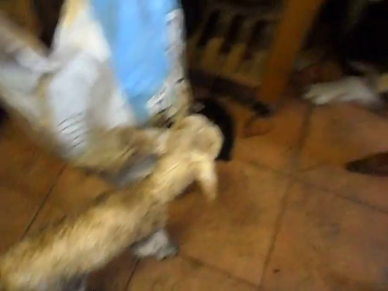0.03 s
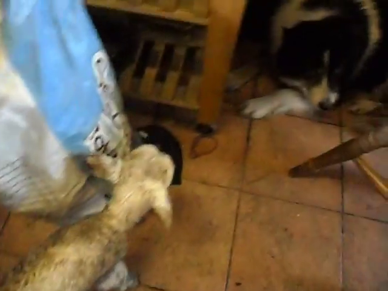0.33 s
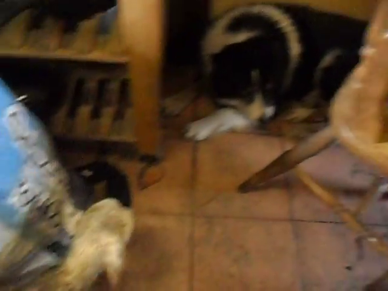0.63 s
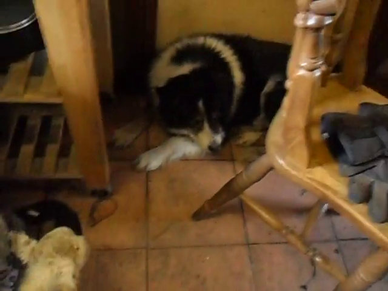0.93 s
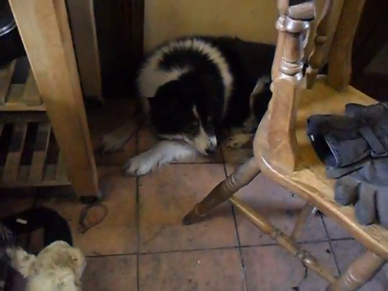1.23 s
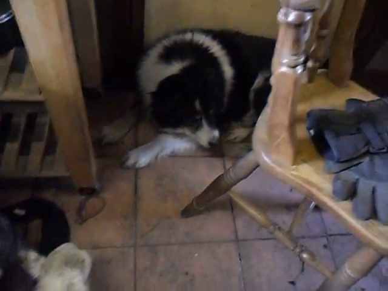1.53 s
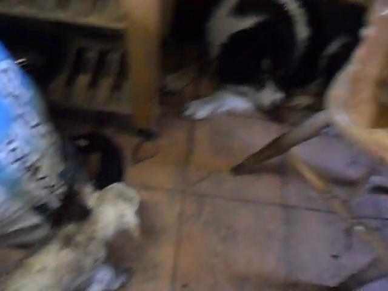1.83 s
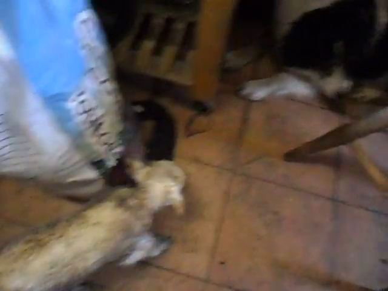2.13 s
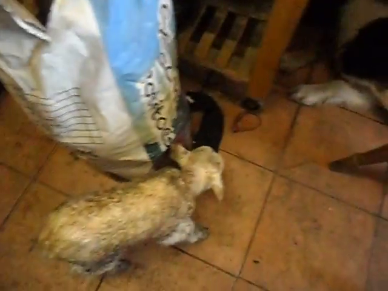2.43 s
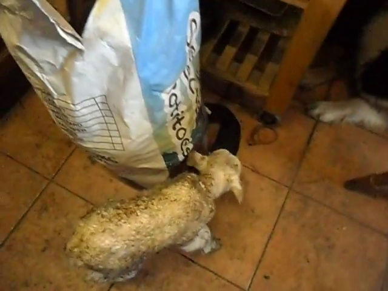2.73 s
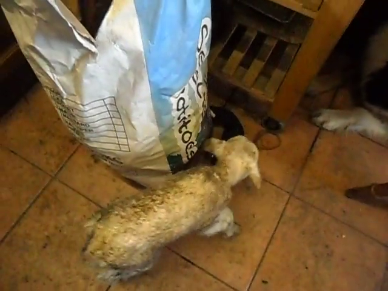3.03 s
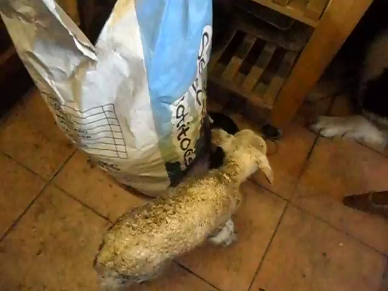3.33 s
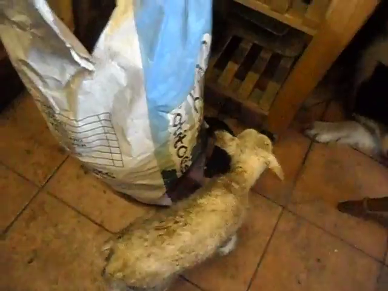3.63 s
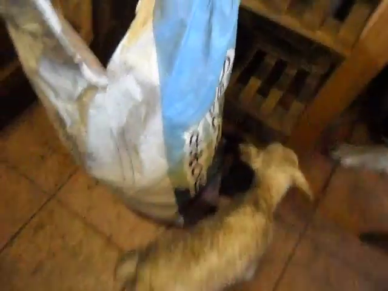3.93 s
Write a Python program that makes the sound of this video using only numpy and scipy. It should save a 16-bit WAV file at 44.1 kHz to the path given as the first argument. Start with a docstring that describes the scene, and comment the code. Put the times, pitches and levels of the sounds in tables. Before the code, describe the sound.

A young lamb bleats once, harsh and quavering, in a quiet kitchen.

```python
"""A young lamb bleats once in a quiet, tiled kitchen.
Its vocal folds buzz and rasp, and its moving mouth shapes the buzz: a soft grunt and a half-closed
start open into a harsh, quavering cry that clears, holds and sags away.
A few light ticks, likely its hooves, are tiny bursts of noise.
The walls answer with a short echo, and a steady hiss lies under it all."""
import sys
import numpy as np
from scipy import signal
from scipy.fft import rfft, irfft, next_fast_len
from scipy.io import wavfile
from scipy.ndimage import uniform_filter1d, map_coordinates

SR = 44100
rng = np.random.default_rng(int(sys.argv[2]) if len(sys.argv) > 2 else 0)


def dump(signal):
    """Clip the signal to [-1, 1] and save it as 16-bit WAV at the path in sys.argv[1]."""
    limited = np.clip(np.atleast_2d(signal).T, -1, 1)
    pcm = np.round(limited * 32767).astype(np.int16)
    wavfile.write(sys.argv[1], SR, pcm)


N = 176400  # 4 seconds

# The voice quavers as it climbs, holds, then sags. Each row: time in seconds, pitch in Hz.
VOICE_PITCH = [(3.22, 270), (3.255, 349.6), (3.33, 352.5), (3.38, 328.6), (3.4, 366.8), (3.43, 336.8),
               (3.452, 364), (3.478, 362), (3.505, 345.3), (3.548, 373.1), (3.57, 357), (3.59, 373.3),
               (3.645, 378.2), (3.68, 370.1), (3.73, 382.1), (3.765, 361), (3.79, 377.3), (3.815, 362.3),
               (3.835, 348), (3.88, 305.8)]
# The voice swells about 13 times a second. Each row: time in seconds, level in dB.
VOICE_LEVEL = [(3.21, -68.5), (3.258, -43.5), (3.283, -69), (3.305, -58), (3.343, -27.5), (3.382, -39.5),
               (3.422, -21), (3.448, -24), (3.478, -25), (3.502, -19), (3.525, -28), (3.562, -23.5),
               (3.615, -26), (3.657, -21.5), (3.684, -29), (3.71, -22), (3.735, -26.5), (3.752, -25.5),
               (3.766, -34.5), (3.802, -23), (3.82, -36), (3.866, -40.5), (3.897, -54)]
# How hoarse the voice is. Each row: time in seconds, roughness from 0 to 1.
VOICE_ROUGHNESS = [(3.23, .5), (3.26, .3), (3.34, .06), (3.385, .24), (3.42, .22), (3.45, .38), (3.49, .24),
                   (3.525, .38), (3.57, .22), (3.72, .1), (3.76, .3), (3.8, .12), (3.84, .45)]
# How the mouth moves. Each row: time in seconds, shape number
# (0 closed, 1 half closed, 2 wide open, 3 held, 4 half closed again).
MOUTH_MOVES = [(3.28, 0), (3.325, .5), (3.345, 1), (3.37, 1.05), (3.415, 2), (3.51, 2), (3.65, 3),
               (3.81, 3), (3.85, 3.25)]
# How the throat and mouth ring in each shape. Each row: frequency in Hz, boost or cut in dB.
MOUTH_CLOSED = [(200, -14), (350, 1), (700, -4), (1040, 3.5), (1400, -5), (2100, -14.5), (2750, -10),
                (3600, -17), (4800, -15), (7000, -27), (11000, -51)]
MOUTH_HALF_CLOSED = [(200, -63), (340, -9.5), (700, -12.5), (1040, 0.5), (1380, -5), (1750, -13),
                     (2150, -25), (2450, -12.5), (2750, -3), (3100, -5), (3350, -12), (3600, -24),
                     (4200, -16.5), (4800, -14.5), (5400, -28), (5900, -18.5), (6400, -31), (7000, -28),
                     (7800, -28), (9000, -36), (11000, -48.5)]
MOUTH_WIDE_OPEN = [(200, -43), (350, -19.5), (700, -22.5), (1060, -8), (1430, 1), (1780, -14.5),
                   (2100, -17.5), (2800, -12.5), (3050, -21), (3500, -2), (4100, -21), (4550, -7),
                   (5000, -5.5), (5600, -14.5), (6300, -21.5), (7200, -28.5), (8000, -34.5), (9600, -30),
                   (11000, -43.5)]
MOUTH_HELD = [(200, -59), (370, -26), (750, -20.5), (1130, -12.5), (1500, 5), (1880, -12.5), (2270, -11.5),
              (2650, -15), (3000, -22), (3400, -12), (3770, -5), (4200, -19.5), (4950, -12), (5600, -22.5),
              (6100, -19.5), (7000, -30.5), (8200, -33), (9500, -39.5), (11000, -49)]
# The throat catches between swells and chokes the bass. Each row: time in seconds, bass cut in dB.
THROAT_CATCHES = [(3.372, 12), (3.448, 11), (3.526, 12), (3.672, 0), (3.763, -1), (3.836, 10)]
# How bright the voice is. Each row: time in seconds, treble boost or cut in dB.
VOICE_TREBLE = [(3.44, 1), (3.465, -1), (3.505, 2), (3.6, -0.5), (3.66, 2.5), (3.685, 1), (3.71, 1),
                (3.75, 2), (3.77, 4), (3.8, -3.5), (3.825, 2), (3.87, -1.5)]
# Light ticks. Each row: start in seconds, peak level in dB, centre frequency in Hz, width in octaves.
HOOF_TICKS = [(3.392, -30, 900, 0.79), (3.634, -25.5, 8200, .35), (3.938, -32, 1200, 1.16),
              (3.958, -32, 2385, 1.8), (3.9915, -55, 4530, 1.3)]
# How long the kitchen echoes. Each row: frequency in Hz, seconds to fade by 60 dB.
ECHO_FADE = [(200, 0.3), (1200, 0.21), (3000, 0.33), (11000, 0.067)]
# The tone of the hiss. Each row: frequency in Hz, relative level in dB.
HISS_TONE = [(12, -41.5), (20, -2), (91, -1), (171, -3), (240, -2), (267, -3.5), (405, -4), (439, -5.5),
             (616, -6.5), (866, -7), (1460, -10), (2000, -10.5), (2340, -11.5), (7800, -16), (10400, -17.5),
             (13500, -37.5), (22000, -120)]
# The whole sound is duller at the very top. Each row: frequency in Hz, level change in dB.
TREBLE_ROLL_OFF = [(10200, 0), (10700, -8), (11200, -8), (12000, -14)]


def lamb(bass_hz=1200, treble_hz=2050, bass_boost_db=0.5, catch_half_width_s=0.014):
    """The mouth glides between four shapes that colour the buzz, while throat catches thin the bass."""
    shapes = [MOUTH_CLOSED, MOUTH_HALF_CLOSED, MOUTH_WIDE_OPEN, MOUTH_HELD, MOUTH_HALF_CLOSED]
    buzz, mouth, t = vocal_folds(), over_time(MOUTH_MOVES), np.arange(N) / SR
    voice = np.zeros(N)
    for number, shape in enumerate(shapes):
        share = np.maximum(1 - abs(mouth - number), 0)
        voice += share * filtered(buzz, lambda hz: at_frequency(shape, hz))
    bass = below(voice, bass_hz)
    treble = voice - below(voice, treble_hz)
    middle = voice - bass - treble
    choke_db = sum(db * np.exp(-((t - when) / catch_half_width_s) ** 2) for when, db in THROAT_CATCHES)
    voice = bass * gain(bass_boost_db - choke_db) + middle + treble * gain(over_time(VOICE_TREBLE))
    # Even out the loudness first, so that VOICE_LEVEL sets the swells.
    voice /= np.sqrt(abs(uniform_filter1d(voice ** 2, size=600)) + 1e-9)
    bleating = (t > VOICE_LEVEL[0][0]) & (t < VOICE_LEVEL[-1][0])
    return voice * gain(over_time(VOICE_LEVEL)) * bleating


def vocal_folds(jitter_cycles=0.035, shimmer_db=1.5, unsteady_hz=130, flutter_db=3.5, flutter_hz=27.99):
    """The folds pulse unevenly in timing (jitter) and strength (shimmer), with a rasp of air."""
    roughness = over_time(VOICE_ROUGHNESS)
    cycles = np.cumsum(over_time(VOICE_PITCH)) / SR
    phase = 2 * np.pi * (cycles + jitter_cycles * roughness * wobble(unsteady_hz))
    pulses = np.zeros(N)
    for harmonic in range(1, 35):
        # Each harmonic (a multiple of the pitch) swells and drops on its own, fully from the ninth up.
        depth_db = flutter_db * min(harmonic / 8.7, 1) ** 2
        lag = 0.0586 * harmonic ** 2  # in radians: higher harmonics arrive slightly later, softening each pulse
        pulses += gain(depth_db * wobble(flutter_hz)) * np.cos(harmonic * phase - lag)
    air = rasp(phase)
    shimmer = gain(shimmer_db * roughness * wobble(unsteady_hz))
    return normalised(pulses) * shimmer + roughness * air


def rasp(phase, boost_db=6.5, edge_hz=5200):
    """The folds tear the air into one puff of mostly high noise in every cycle."""
    puffs = rng.standard_normal(N) * (1 + np.cos(phase)) ** 2
    air = filtered(puffs, lambda hz: -10 * np.log10(1 + (edge_hz / (hz + 1)) ** 4))
    return gain(boost_db) * normalised(air)


def hoof_ticks(fade_s=0.009):
    """Each tick is a dry snap of noise in one broad band of frequencies."""
    ticks, t = np.zeros(N + SR), np.arange(SR // 20) / SR
    for start, peak_db, centre_hz, octaves in HOOF_TICKS:
        burst = rng.standard_normal(len(t)) * gain(-60 * t / fade_s)
        band_db = lambda hz: -20 * np.log10(1 + (np.log2((hz + 1) / centre_hz) / octaves) ** 2)
        snap = filtered(burst, band_db)
        ticks[round(start * SR):][:len(t)] += gain(peak_db) * snap / abs(snap).max()
    return ticks[:N]


def kitchen(sound, echo_db=-13, build_up_s=0.007):
    """The walls add a short, dense echo to the sound."""
    hz, t, noise = signal.stft(rng.standard_normal(SR // 2), SR, nperseg=256)
    fade = gain(-60 * t / at_frequency(ECHO_FADE, hz)[:, None])
    build_up = 1 - np.exp(-t / build_up_s)
    _, tail = signal.istft(noise * fade * build_up, SR, nperseg=256)
    echo = signal.fftconvolve(sound, tail / np.linalg.norm(tail))[:N]
    return sound + gain(echo_db) * echo


def hiss(level_db=-59.5, top_hz=12300):
    """Room noise and microphone hiss make a steady background."""
    tone_db = lambda hz: at_frequency(HISS_TONE, hz) - 60 * (hz > top_hz)
    return gain(level_db) * normalised(filtered(rng.standard_normal(N), tone_db))


def gain(db):
    """Turn decibels into a number to multiply by."""
    return 10 ** (np.asarray(db) / 20)


def normalised(sound):
    """Scale a sound to an average power of 1."""
    return sound / np.sqrt(np.mean(sound ** 2) + 1e-20)


def at_frequency(rows, hz):
    """Read a table between its rows, with octaves evenly spaced."""
    frequencies, values = np.transpose(rows)
    return np.interp(np.log(hz + 1), np.log(frequencies + 1), values)


def over_time(rows):
    """Join a table's rows with straight lines, giving one value per sample."""
    return np.interp(np.arange(N) / SR, *np.transpose(rows))


def wobble(rate):
    """A smooth curve through `rate` random values a second."""
    values = rng.standard_normal(int(N * rate / SR) + 4)
    steps = np.arange(0, N, 32)
    return np.interp(np.arange(N), steps, map_coordinates(values, [steps * rate / SR]))


def filtered(sound, gain_db):
    """Boost or cut each frequency by gain_db(hz) decibels."""
    size = 2 * next_fast_len(len(sound))
    hz = np.fft.rfftfreq(size, 1 / SR)
    cepstrum = irfft(np.log(gain(gain_db(hz))), size)
    # These two lines make the filter ring only after a sound, never before it.
    cepstrum[1:size // 2] *= 2
    cepstrum[size // 2 + 1:] = 0
    return irfft(rfft(sound, size) * np.exp(rfft(cepstrum)), size)[:len(sound)]


def below(sound, edge_hz):
    """Keep the part of a sound that is lower than edge_hz."""
    hz = np.fft.rfftfreq(N, 1 / SR)
    return irfft(rfft(sound) / (1 + (hz / edge_hz) ** 20), N)


def scene():
    """The lamb and the ticks sound in the kitchen, over the hiss, in one channel."""
    return (kitchen(lamb() + hoof_ticks()) + hiss())[None]


def record(dry, top_hz=12300):
    """Soften the highest treble and keep nothing above top_hz."""
    size = next_fast_len(N + SR // 2)
    hz = np.fft.rfftfreq(size, 1 / SR)
    roll_off = gain(at_frequency(TREBLE_ROLL_OFF, hz)) * (hz < top_hz)
    return irfft(rfft(dry, size) * roll_off, size)[:, :N]


dry = scene()
out = record(dry)
dump(out)
```